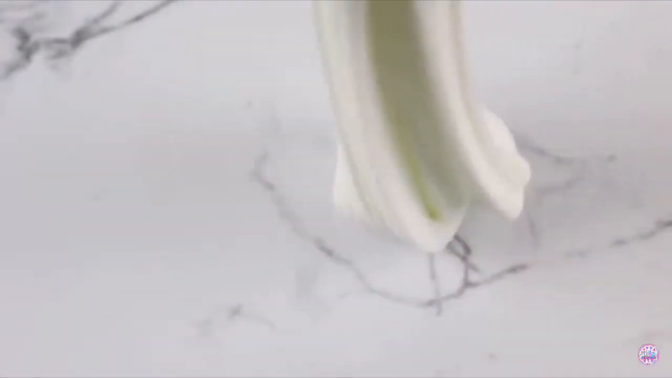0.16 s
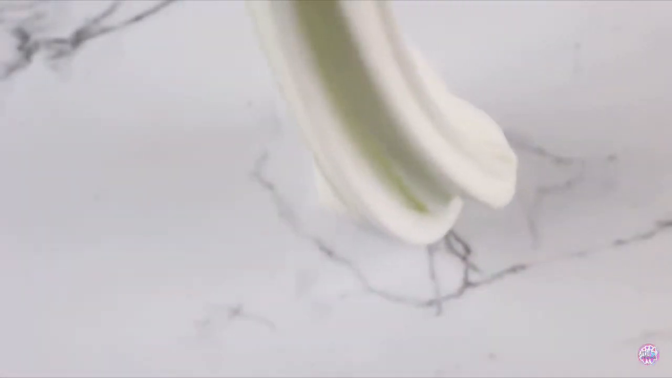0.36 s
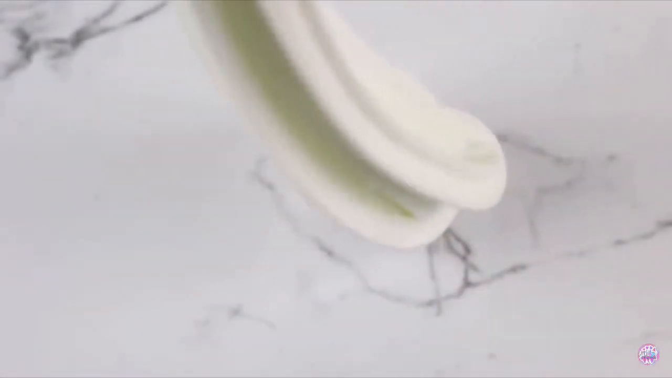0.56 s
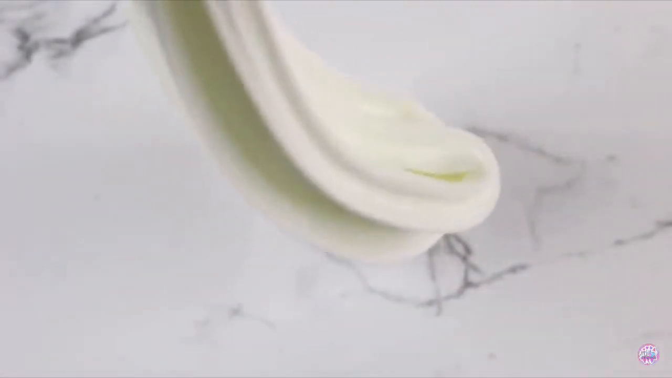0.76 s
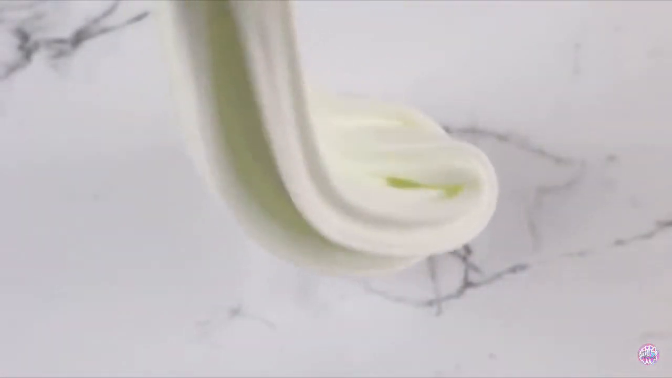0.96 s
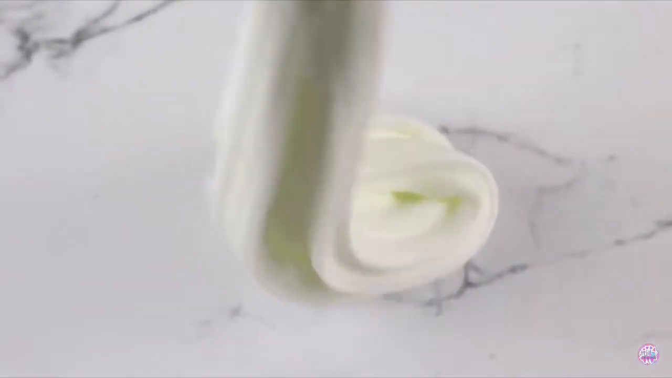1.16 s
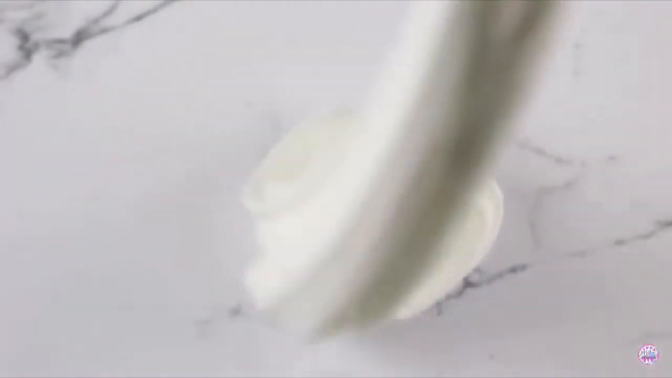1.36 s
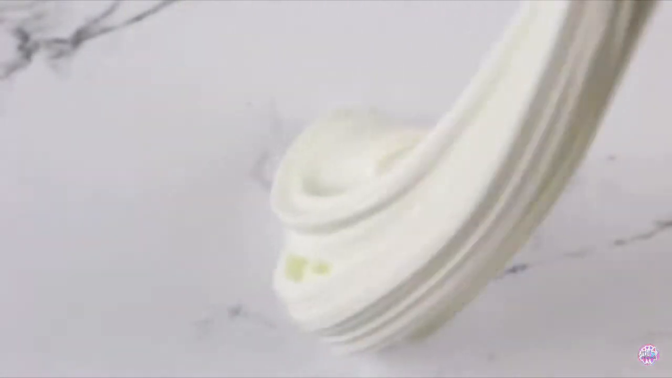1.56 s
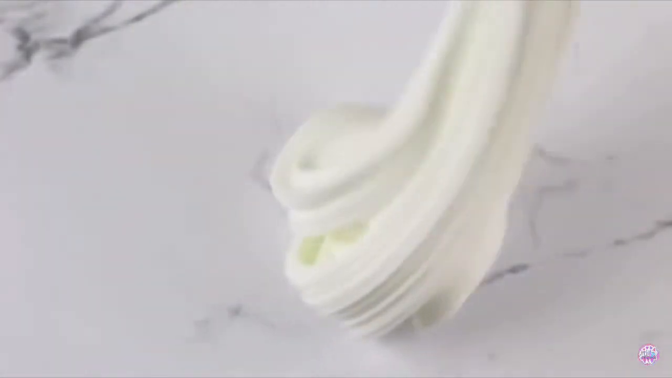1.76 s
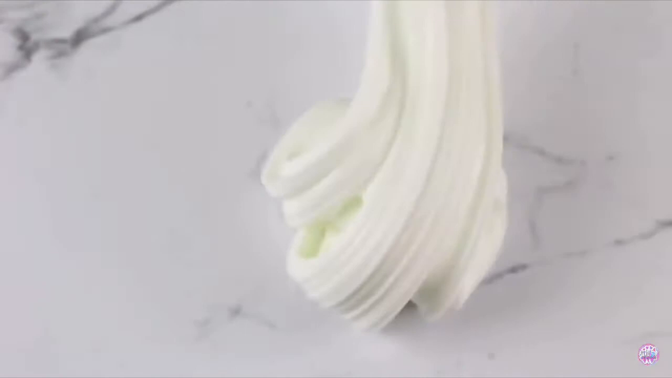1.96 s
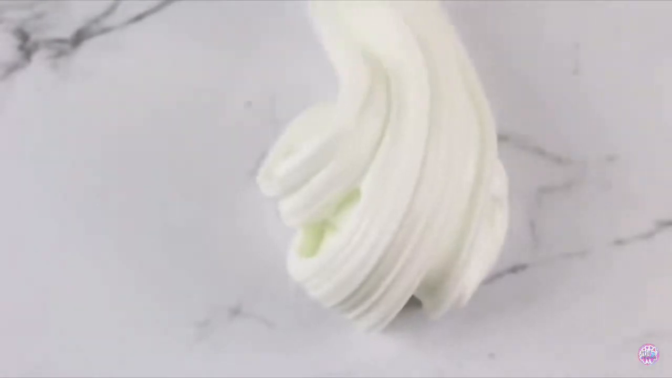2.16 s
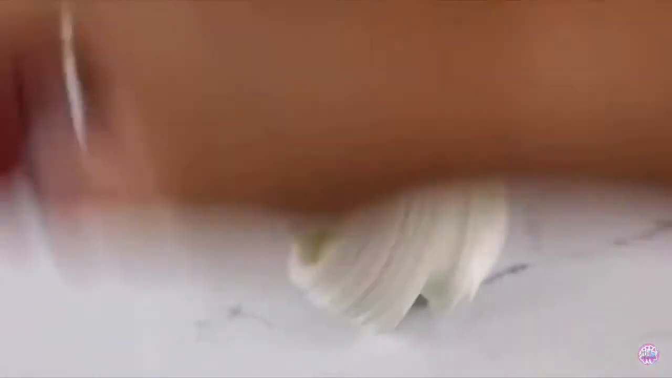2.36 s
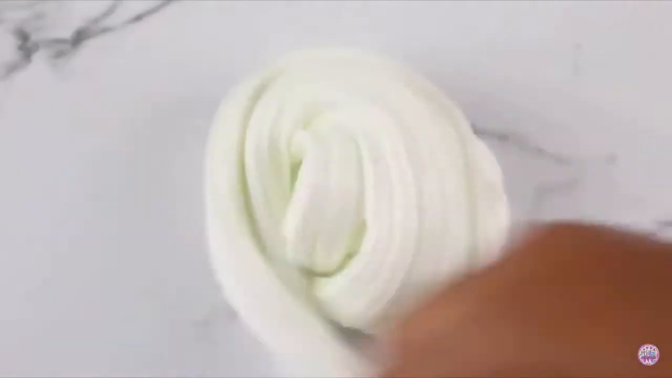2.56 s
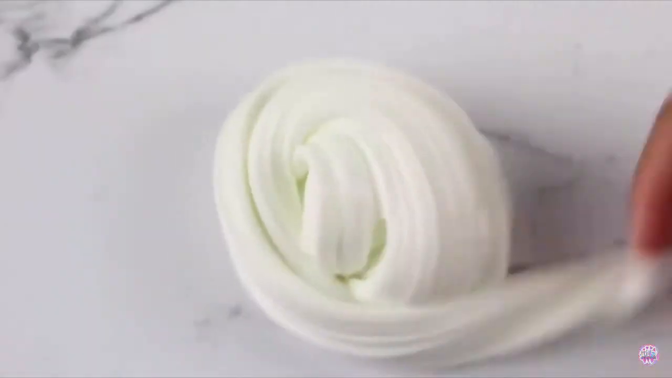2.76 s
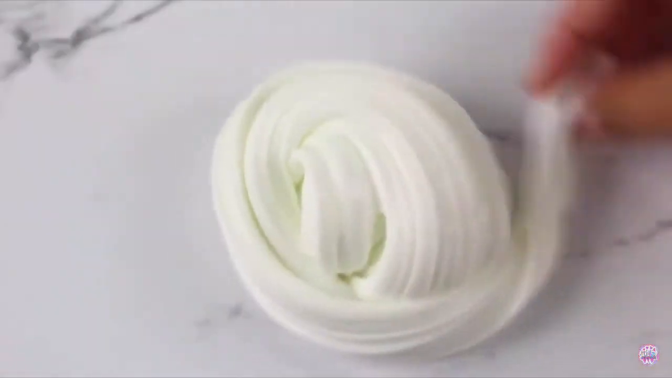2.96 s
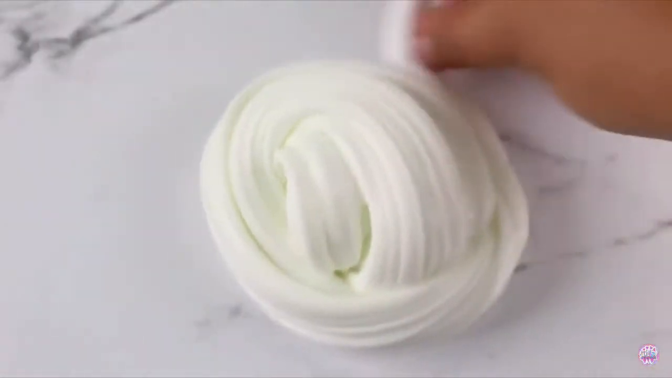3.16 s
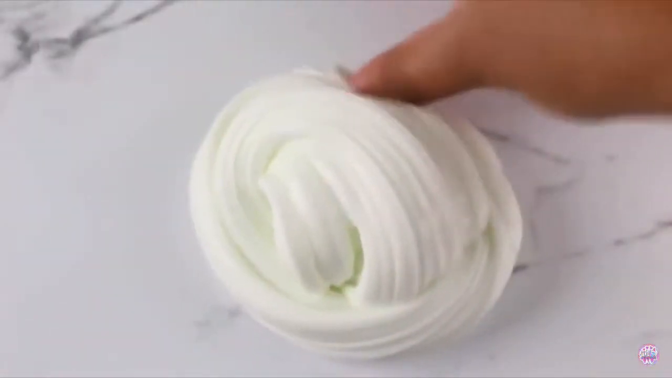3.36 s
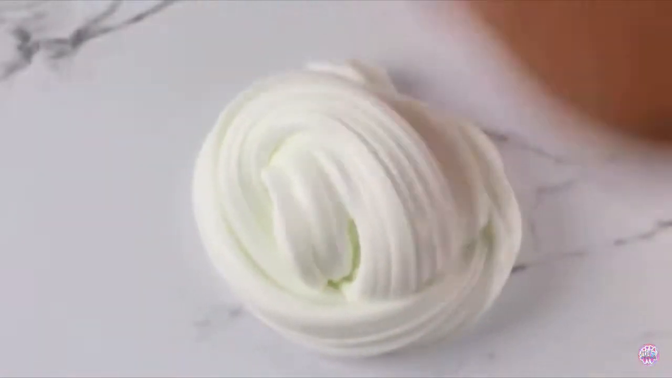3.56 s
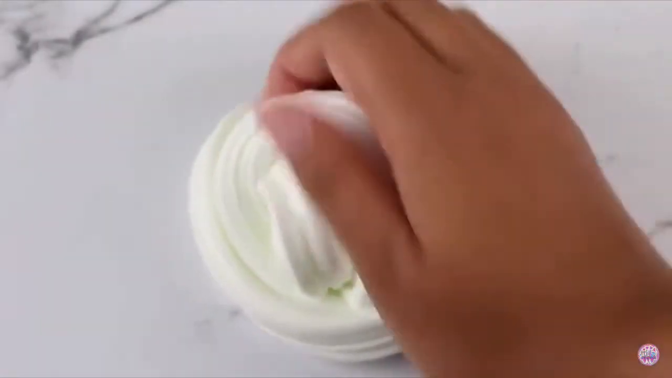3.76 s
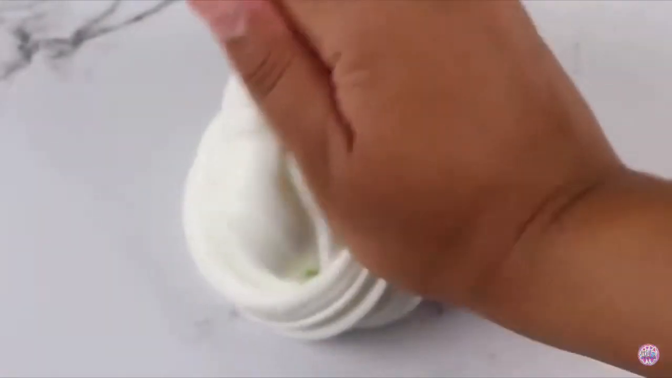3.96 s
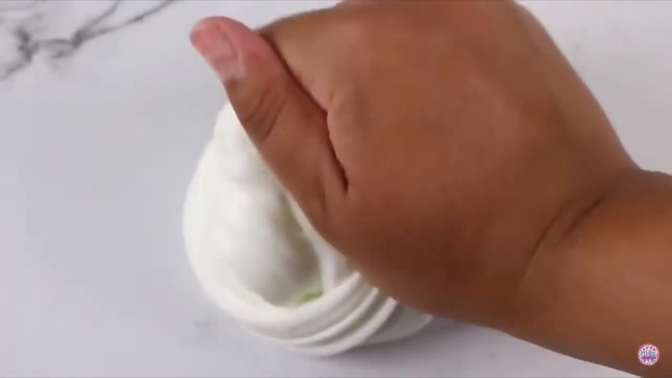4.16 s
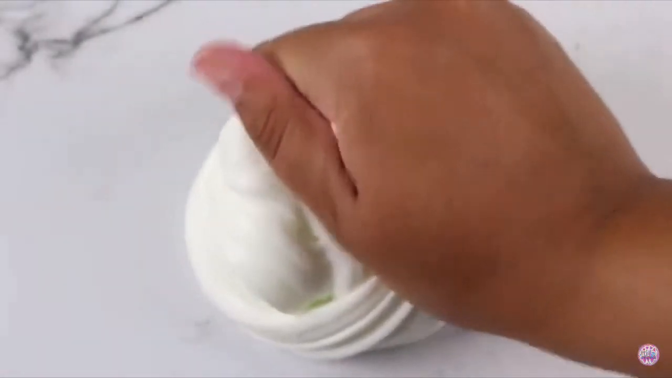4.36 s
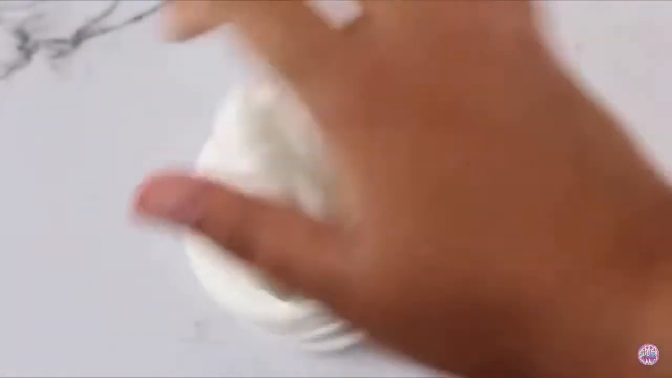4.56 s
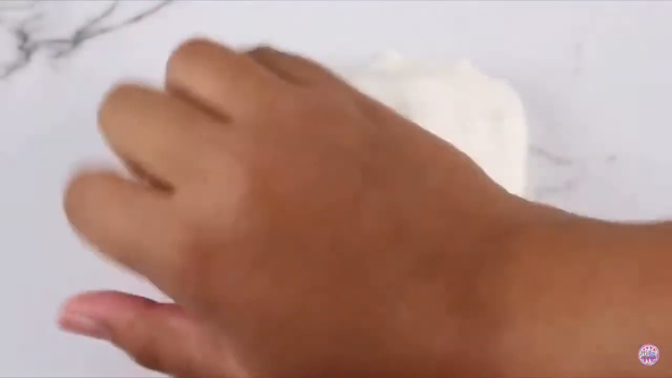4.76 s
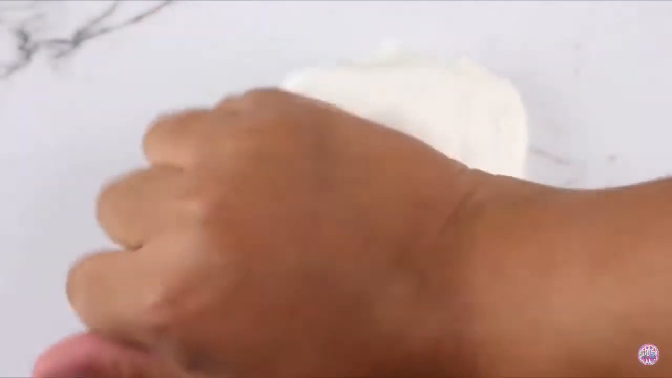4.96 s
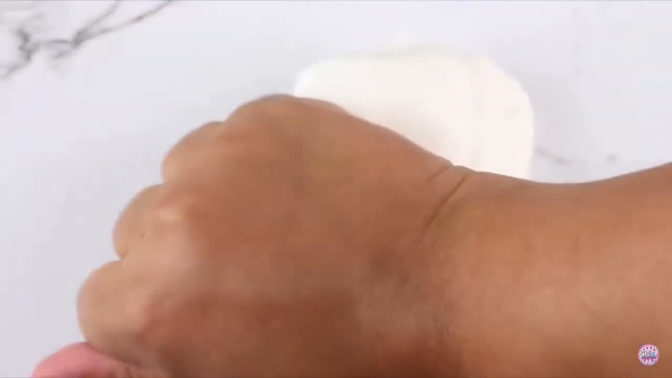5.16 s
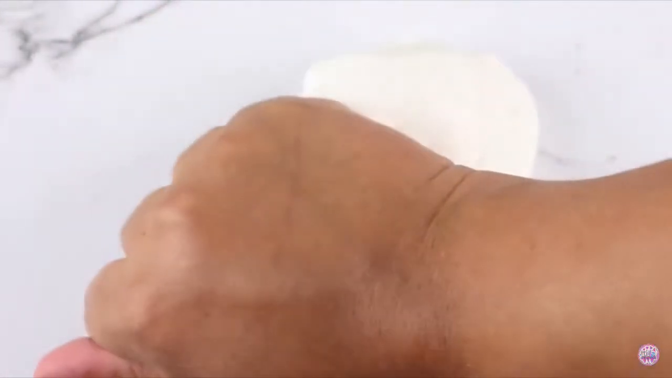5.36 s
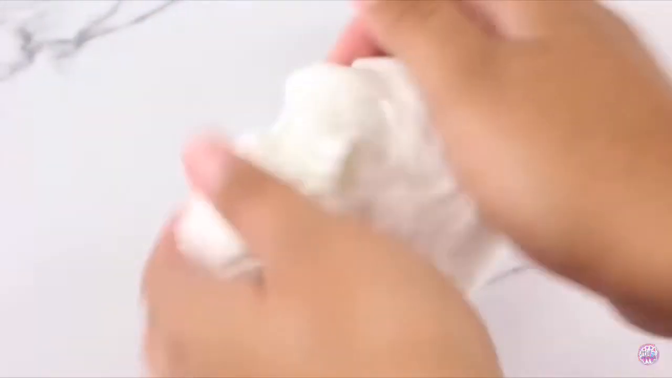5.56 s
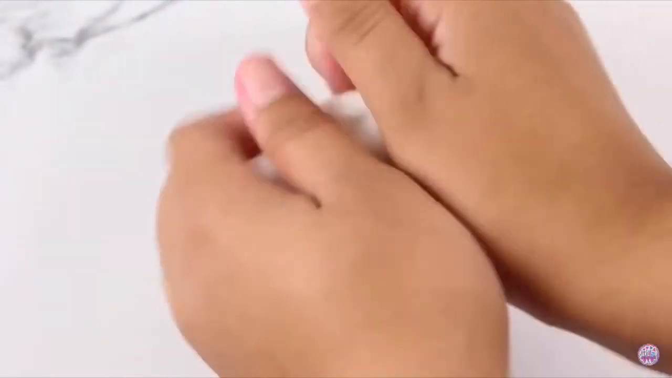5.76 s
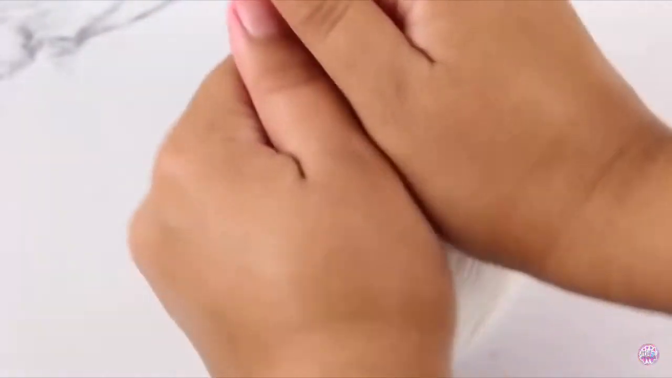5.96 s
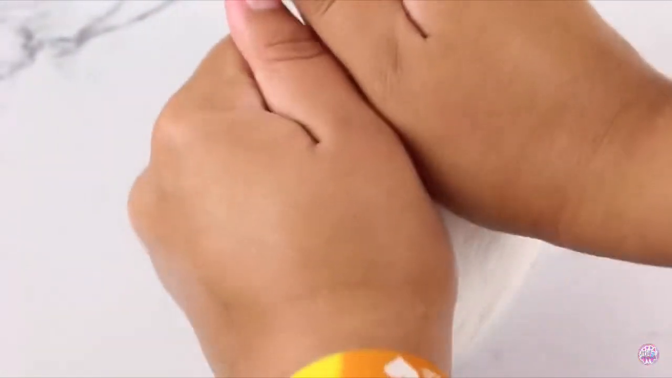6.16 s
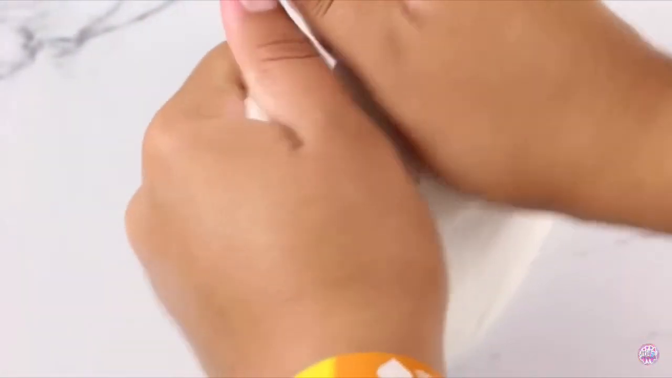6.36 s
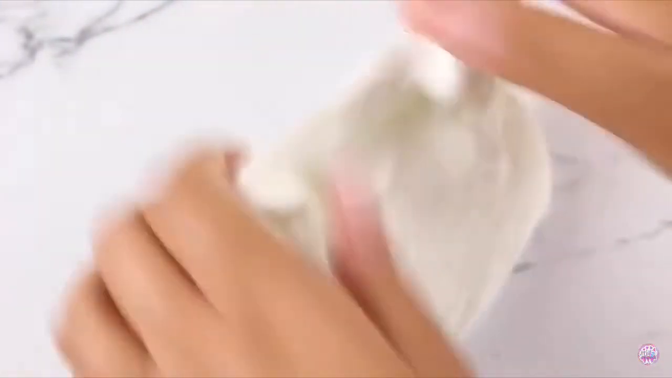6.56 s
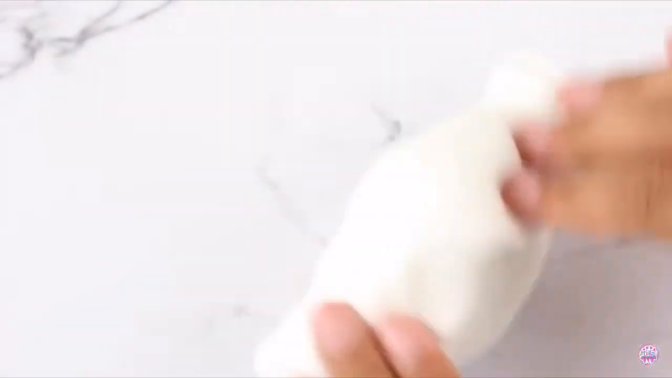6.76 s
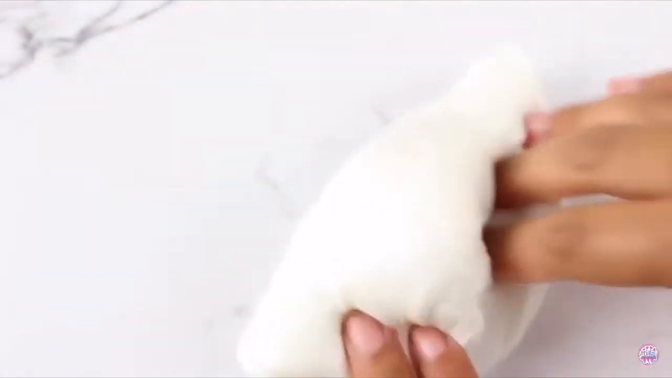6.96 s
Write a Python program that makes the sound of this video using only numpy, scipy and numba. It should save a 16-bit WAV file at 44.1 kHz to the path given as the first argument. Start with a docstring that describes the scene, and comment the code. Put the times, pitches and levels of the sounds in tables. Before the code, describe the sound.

Hands knead soft slime close by, with sharp bubble pops, dense wet crackling and soft thumps on a table.

```python
"""Soft slime is folded and kneaded on a stone table top, close by in a small, echoing room.
Large trapped air bubbles pop as their skin tears and the air inside rings; tiny ones crackle
under the hands. The table thumps and rumbles softly, over a faint hiss and hum.
The loudest pops overload the microphone; its gain control ducks and lets the room swell back."""
import sys
import numpy as np
from scipy import signal
from scipy.fft import rfft, irfft
from scipy.io import wavfile
from scipy.ndimage import uniform_filter1d, map_coordinates
from numba import njit

SR = 44100
rng = np.random.default_rng(int(sys.argv[2]) if len(sys.argv) > 2 else 0)


def to_wav(sig):
    """Store sig (one row per channel, or 1-D mono) as 16-bit WAV at the path in sys.argv[1].

    Samples outside -1..1 are clipped; the rate is SR.
    """
    pcm = np.clip(np.atleast_2d(sig), -1, 1) * 32767
    pcm = np.round(pcm).astype(np.int16)
    wavfile.write(sys.argv[1], SR, pcm.T)  # frames by channels


N = 309136
TIME = np.arange(N) / SR

# The tone of the steady hiss. Each row: frequency in Hz, relative level in dB.
HISS_SHAPE = [(15, -48), (25, -12), (39, -28), (59, 6.5), (71, -4), (91, -11), (113, -8.5), (148, -12),
              (260, -9), (297, -9), (433, -14.5), (552, -13.5), (1800, -19.5), (15500, -28.5)]
# The mains hum. Each row: pitch in Hz, level in dB.
HUM_TONES = [(58.8, -61.5), (119, -61)]
# Bubble pops. Each row: start in seconds, level in dB, pitch in Hz, relative level of the snap in dB.
POPS = [(0.048, -30.5, 3170, -20), (1.1645, -17, 6100, -3.5), (2.73, -23, 4600, -5),
        (3.0008, -17, 960, -6), (3.0208, -18.5, 770, -1), (3.6321, -15.5, 4700, -6),
        (3.887, -26, 2770, -23), (4.0586, -11.5, 906, -14), (4.089, -17.5, 4180, 2.5),
        (4.127, -20.5, 963, -11), (4.1876, -23, 4000, 9.5), (4.2588, -5, 4960, -7),
        (4.273, -15.5, 6940, 7), (4.2763, -12, 1020, 7.5), (4.311, -9, 9000, 2),
        (4.3447, -8, 10100, -0.5), (4.3525, 15.5, 11140, -3), (4.4112, -9, 7400, -8),
        (4.4622, -3, 4000, -2.5), (4.4837, 4.5, 11900, 0), (4.5029, 4.5, 2120, -4),
        (4.737, -14, 1920, -0.5), (4.9891, -31, 1810, 5), (5.028, -20.5, 2440, 9.5),
        (5.1068, -16, 3400, -3), (5.143, -9.5, 3530, -11), (5.1947, -3.5, 6400, 0.5),
        (5.2145, -10, 515, 7), (5.283, 4.5, 2160, 0), (5.2992, 8.5, 4550, -8), (5.3568, 13, 3640, -0.5),
        (5.401, -11.5, 3370, -11), (5.4356, -14, 6460, 12), (5.5303, -8.5, 6460, 1),
        (5.5736, 23, 5570, -10.5), (5.7009, -9.5, 2300, 1), (5.7188, -5.5, 1620, 3.5),
        (5.7588, -8.5, 2350, -6.5), (5.8106, -12, 840, -1), (5.8106, -0.5, 7400, -10.5),
        (6.083, -15.5, 3040, -0.5), (6.1254, -16, 2600, -22), (6.1566, -4.5, 2620, -10),
        (6.1724, -6.5, 2830, -9), (6.1924, 7, 3230, -8.5), (6.241, -4, 1620, 16.5),
        (6.2918, 5.5, 4420, 6), (6.312, 12, 3220, -2), (6.389, -9, 11400, -45), (6.428, -6, 10100, 5),
        (6.4359, 17.5, 7870, -8), (6.6793, -14, 2740, -1)]
# Hollows between palm and slime. Each row: pitch in Hz, Q (higher rings longer), level in dB.
PALM_HOLLOWS = [(760, 6.1, -3.5), (1540, 21, -11.5)]
# The room's fading tail. Each row: frequency in Hz, relative level in dB, seconds to fade by 60 dB.
ROOM_BANDS = [(192, -31, 0.42), (790, -38, 0.32), (2030, -43, 0.69), (4400, -41, 0.55), (8340, -44, 0.53),
              (15700, -43.5, 0.4)]
# The echo off the nearest surface. Each row: delay in seconds, level in dB.
NEAR_ECHOES = [(0.0115, -14.5)]
# Swells of crackle. The rows at 5.658 and 6.562 seconds are a bright, held hiss that swells after
# the two loudest pops; in the others, a squeeze bursts tiny bubbles. Each row: middle in seconds,
# half length in seconds, level in dB, pitch in Hz, level of the low squelch in dB.
CRACKLE_SWELLS = [(2.594, .025, -48.5, 5500, -70), (3.021, 0.026, -35.5, 3070, -40),
                  (3.163, 0.089, -38.5, 3740, -51), (3.36, 0.14, -56.5, 4520, -69),
                  (3.633, 0.026, -40.5, 4200, -43), (4.116, .09, -41, 3650, -42.5),
                  (4.307, 0.053, -31.5, 6040, -37), (4.65, .045, -27, 4120, -30.5),
                  (4.717, .044, -32, 3850, -55), (5.658, .055, -37.5, 5530, -57),
                  (5.777, 0.071, -47, 3040, -37), (6.027, 0.17, -41, 4000, -39.5),
                  (6.562, 0.082, -39, 7860, -67), (6.673, 0.07, -33.5, 4130, -39),
                  (6.735, 0.1, -39.5, 3600, -61)]
# Slime or a palm lands on the table. Each row: start in seconds, level in dB, contact time in seconds.
LANDINGS = [(3.004, -30, 0.0015), (3.023, -25, 0.0004), (3.644, -31, 0.0014), (4.126, -33, 0.0017),
            (4.636, -32.5, 0.0035), (4.696, -38, 0.0088), (5.215, -34, 0.0053), (6.684, -30, 0.0051)]
# The table's own tones. Each row: pitch in Hz, relative level in dB, seconds to fade by 60 dB.
TABLE_TONES = [(82, -16.5, 0.37), (215.6, -13.5, 0.27), (279.6, 1, 0.14), (370, -18, 0.094),
               (860, -15, .045)]
# The arms lean on the table. Each row: middle in seconds, half length in seconds, level in dB.
ARM_LEANS = [(3.69, 0.093, -50), (4.33, 0.19, -52), (4.67, 0.088, -38), (5.757, 0.048, -38.5),
             (5.98, 0.36, -44.5)]
# The palm bears down on the lump. Each row: start in seconds, end in seconds.
PALM_PRESSES = [(4.1, 4.55), (5.03, 5.56), (5.93, 6.42)]

TOP_HZ = 15900  # the treble is cut above this


def undb(db):
    """Turn decibels into a number to multiply by."""
    return 10 ** (np.asarray(db) / 20)


def unit(x):
    """Scale a signal so that its typical swing is 1."""
    return x / (np.std(x) + 1e-12)


def add(track, start_s, sound):
    """Mix a sound into the track at its start time."""
    i = int(np.clip(round(start_s * SR), 0, N - 1))
    track[i:i + len(sound)] += sound[:N - i]


def band_pass(x, low_hz, high_hz, order=2):
    """Keep mainly what lies between two frequencies."""
    return signal.sosfilt(signal.butter(order, [low_hz, high_hz], "band", fs=SR, output="sos"), x)


def wander(samples):
    """A smooth random drift; more samples make it slower."""
    return unit(uniform_filter1d(uniform_filter1d(rng.standard_normal(N), samples), samples))


def swell(middle, half_length):
    """A smooth rise and fall in level."""
    return np.exp(-2 * ((TIME - middle) / half_length) ** 2)


def hiss_and_hum(hiss_db=-46.78, waver_radians=0.3):
    """An even hiss lies under everything, with a faint, slightly wavering mains hum."""
    shape_hz, shape_db = np.transpose(HISS_SHAPE)
    freqs = np.maximum(np.fft.rfftfreq(N, 1 / SR), 1)
    shape = undb(np.interp(np.log(freqs), np.log(shape_hz), shape_db))
    hiss = unit(irfft(rfft(rng.standard_normal(N)) * shape, N))
    waver = waver_radians * wander(SR // 4)
    hum = sum(undb(db) * np.sqrt(2) * np.sin(2 * np.pi * hz * TIME + waver) for hz, db in HUM_TONES)
    return undb(hiss_db) * hiss + hum


def bubble_ring(hz, cycles, rise=.8, samples=512):
    """A bubble's air rings for a few cycles; its pitch rises as the hole widens."""
    cycles = max(cycles, 1.)
    opening = np.minimum(TIME[:samples] * hz / cycles, 1)
    phase = cycles * opening * (1 + rise * (opening / 2 - .35))  # passes hz near its loudest moment
    loudness = np.sin(np.pi * opening ** .6)
    return loudness * np.sin(2 * np.pi * phase)


def skin_snap(samples, decay_s=0.00036):
    """The bubble's skin tears with a very short, bright crack."""
    t = TIME[:samples]
    spectrum = rfft(rng.standard_normal(samples) * np.exp(-t / decay_s))
    even_burst = irfft(spectrum / np.abs(spectrum))  # equally strong at all frequencies
    crack = band_pass(even_burst * np.exp(-t / decay_s / 10), low_hz=1310, high_hz=14600)
    crack = signal.lfilter([1], [1, -.5], crack)  # wet skin softens the treble
    return crack / np.linalg.norm(crack)


def off_hands(x, scatter_db=-22.0, decay_s=0.0036, samples=1024):
    """The moving hands scatter every pop in a different way."""
    paths = undb(scatter_db) * rng.standard_normal(samples) * np.exp(-TIME[:samples] / decay_s)
    paths[0] = 1  # the direct sound
    return signal.fftconvolve(x, paths)


def pop(hz, snap_db):
    """One bubble tears open and its air chirps."""
    chirp = bubble_ring(hz, cycles=2.24 * (hz / 3530) ** 0.26)  # smaller bubbles ring for more cycles
    snap = 2 * undb(snap_db) * skin_snap(len(chirp))
    return off_hands(chirp + snap)


def listed_pops():
    """The listed bubbles burst one by one."""
    out = np.zeros(N)
    for start, db, hz, snap_db in POPS:
        add(out, start, undb(db) * pop(hz, snap_db))
    return out


def under_hand(x, low_hz=650):
    """Small bubbles give off little bass; the hollows under the hand ring along."""
    x = signal.sosfilt(signal.butter(2, low_hz, "high", fs=SR, output="sos"), x)
    return x + sum(undb(db) * signal.lfilter(*signal.iirpeak(hz, q, fs=SR), x)
                   for hz, q, db in PALM_HOLLOWS)


def off_table(x, delay_s=.00152, spread_s=0.00014, level_db=-9.5):
    """A bubble's underside pushes the opposite way, and that wave bounces off the table."""
    height = wander(2048)
    delay = delay_s + spread_s * height  # later for bubbles higher up
    return -undb(level_db) * map_coordinates(x, [(TIME - delay) * SR])


def room(x, tail_db=-1.97, tail_start_s=.0005):
    """The room adds a near echo and a fading wash of reflections."""
    t = TIME[:SR]
    hz, db, fade_times = np.transpose(ROOM_BANDS)
    freqs = np.maximum(np.fft.rfftfreq(SR, 1 / SR), 1)
    noise_spectrum = rfft(rng.standard_normal(SR))
    response = np.zeros(SR)
    for share, band_db, fade_s in zip(np.eye(len(hz)), db, fade_times):
        band = irfft(noise_spectrum * np.interp(np.log(freqs), np.log(hz), share), SR)
        response += band * undb(band_db + tail_db - 60 * t / fade_s)
    response *= t > tail_start_s
    response[0] = 1  # the direct sound
    for delay, echo_db in NEAR_ECHOES:
        response[int(delay * SR)] += undb(echo_db)
    return signal.fftconvolve(x, response)[:N]


def tiny_chirps(middle, half_length, hz, per_second, spread_octaves=0.39, spread_db=4.5, most=400):
    """A crowd of tiny chirps of mixed pitch swells and fades."""
    out = np.zeros(N)
    count = int(2 * half_length * per_second) + 1
    moments = rng.uniform(-1, 1, most)[:count]
    for moment, (pitch, loudness) in zip(moments, rng.standard_normal((most, 2))):
        chirp = bubble_ring(hz * 2 ** (spread_octaves * pitch), cycles=2.96)
        chirp[0] += 1  # each starts with a tick
        add(out, middle + half_length * moment, undb(spread_db * loudness) * chirp)
    out *= swell(middle, half_length)
    return out * np.sqrt(half_length * SR / (np.sum(out ** 2) + 1e-12))  # same power for any count


def crackle(base_db=-36, base_per_second=1400, doubling_db=8):
    """Tiny bubbles crackle over a wet squelch; a bright, held hiss swells after the two loudest pops."""
    out = np.zeros(N)
    for middle, half_length, db, hz, squelch_db in CRACKLE_SWELLS:
        per_second = base_per_second * 2 ** ((db - base_db) / doubling_db)  # louder is also denser
        out += undb(db) * tiny_chirps(middle, half_length, hz, per_second)
        out += undb(squelch_db) * tiny_chirps(middle, half_length, hz=780, per_second=680)
    return out


def table_thumps():
    """Soft landings make the table ring; a longer contact leaves only its low tones."""
    pushes, t = np.zeros(N), TIME[:SR // 2]
    for start, db, contact_s in LANDINGS:
        push = t * np.exp(-2 * np.pi * t / contact_s)
        add(pushes, start, undb(db) * push / push.sum())
    ring = sum(undb(db - 60 * t / fade_s) * np.sin(2 * np.pi * hz * t) for hz, db, fade_s in TABLE_TONES)
    return signal.fftconvolve(pushes, ring)[:N]


def arm_rumble():
    """The weight of the arms rumbles through the table."""
    low_noise = unit(band_pass(rng.standard_normal(N), low_hz=45, high_hz=300))
    weight = sum(undb(db) * swell(middle, half_length) for middle, half_length, db in ARM_LEANS)
    return low_noise * weight


def press_pops(per_second=20, spread_octaves=0.3, spread_db=2.5, most=24):
    """Further pops, with the same bubble sound, give way at uneven moments during each press, louder and higher
    as it squeezes their air."""
    out = np.zeros(N)
    for start, end in PALM_PRESSES:
        moments = start + (np.arange(most) + rng.random(most)) / per_second
        for moment, (pitch, loudness) in zip(moments, rng.standard_normal((most, 2))):
            hz = np.interp(moment, (start, end), (3300, 7150)) * 2 ** (spread_octaves * pitch)
            db = np.interp(moment, (start, end), (-25.5, -16.5)) + spread_db * loudness
            sound = undb(db) * pop(min(hz, TOP_HZ), snap_db=-0.5)
            if moment < end:
                add(out, moment, sound)
    return out


@njit
def gain_control(x, threshold, fall_db_per_s, rise_db_per_s):
    """The volume is turned down while peaks pass the threshold, then creeps back up."""
    out, peak, cut_db = np.empty(len(x)), 0., 0.
    for i in range(len(x)):
        out[i] = x[i] * 10 ** (-cut_db / 20)
        peak = max(abs(out[i]), peak * .93)
        too_loud = min(max((peak - threshold) * 5, 0.), 1.)
        cut_db = max(cut_db + (fall_db_per_s * too_loud - rise_db_per_s) / SR, 0.)
    return out


def overload(x, shift=0.43):
    """Peaks that are too big get flattened and push the amplifier off centre, which thumps."""
    excess = np.clip(np.abs(x) - 1, 0, 1)
    thump = band_pass(excess, low_hz=210, high_hz=750, order=1)
    return np.clip(x - shift * thump, -1, 1)


def scene():
    """Bubbles and table sound in the room, over the hiss and hum."""
    bubbles = under_hand(listed_pops() + press_pops() + crackle())
    in_room = room(bubbles + table_thumps())
    return (in_room + off_table(bubbles) + arm_rumble() + hiss_and_hum())[None]


def record(dry):
    """The gain control is too slow for the loudest pops, so they overload; the top treble is cut."""
    ducked = gain_control(dry[0], threshold=.9, fall_db_per_s=5500., rise_db_per_s=95.)
    treble_cut = signal.ellip(8, .2, 70, TOP_HZ, fs=SR, output="sos")
    return signal.sosfilt(treble_cut, overload(ducked))[None]


dry = scene()
out = record(dry)
to_wav(out)
```